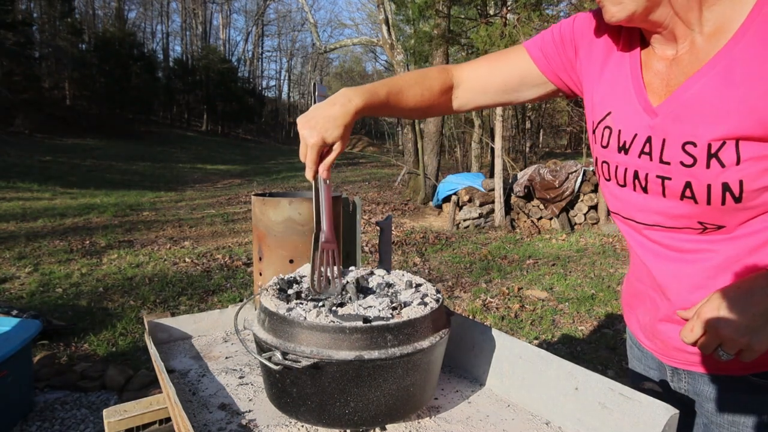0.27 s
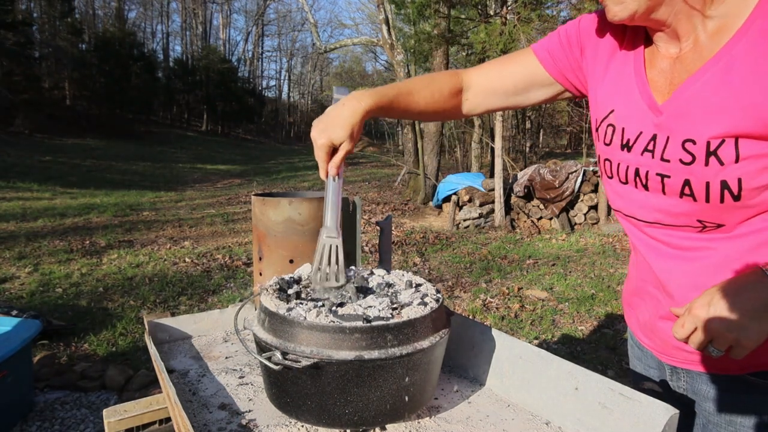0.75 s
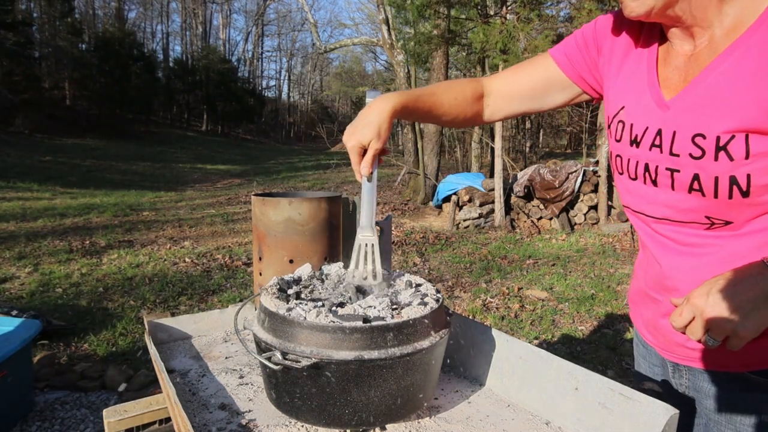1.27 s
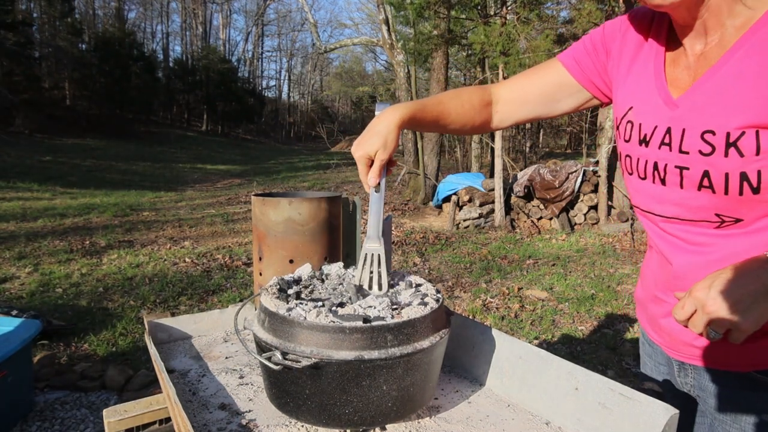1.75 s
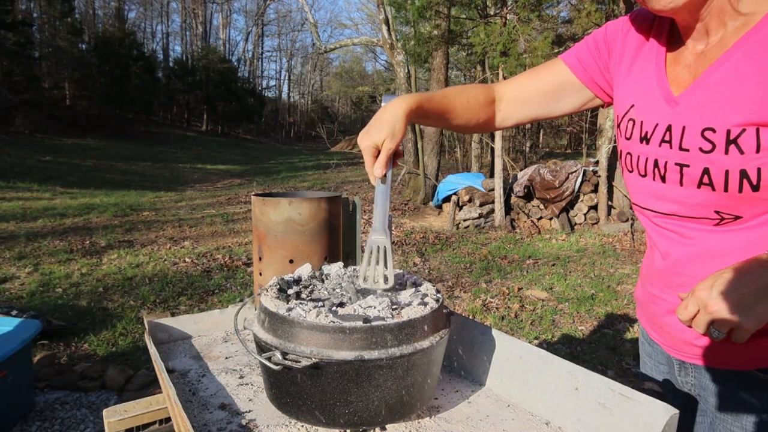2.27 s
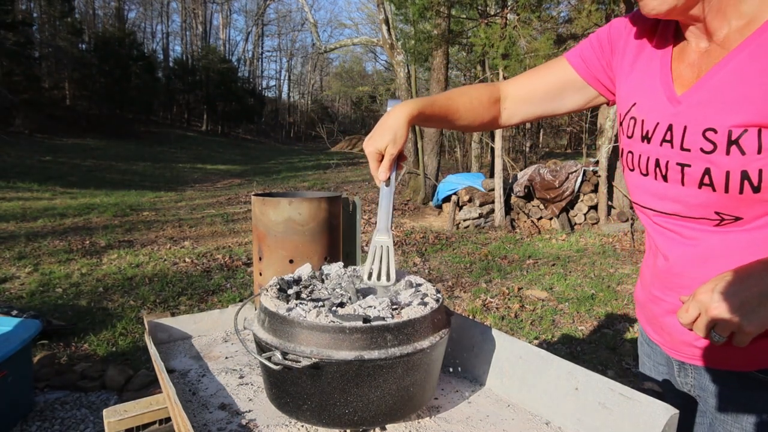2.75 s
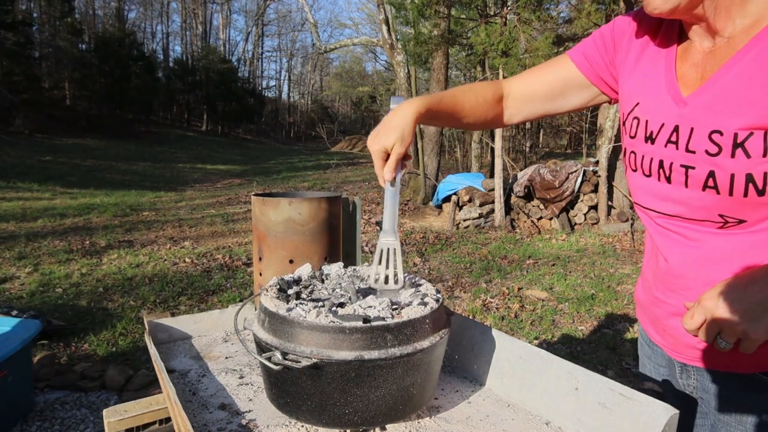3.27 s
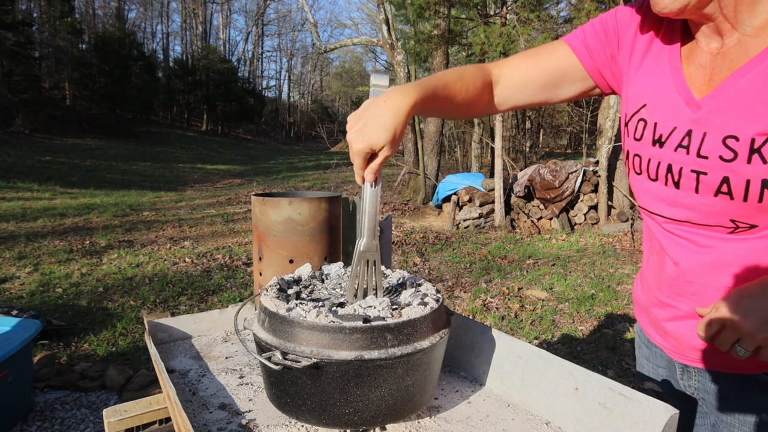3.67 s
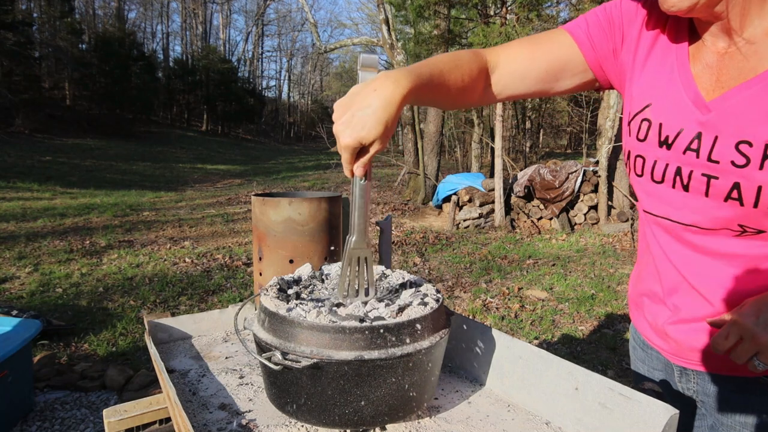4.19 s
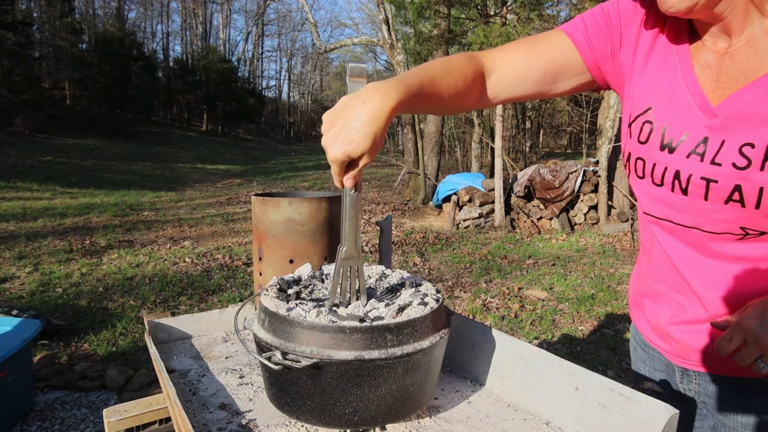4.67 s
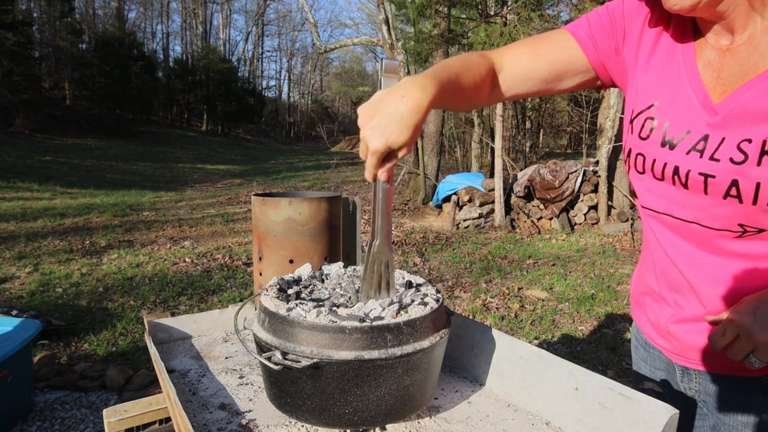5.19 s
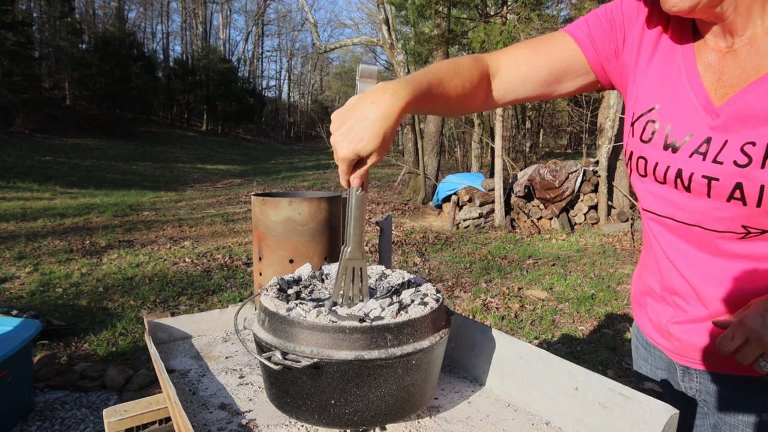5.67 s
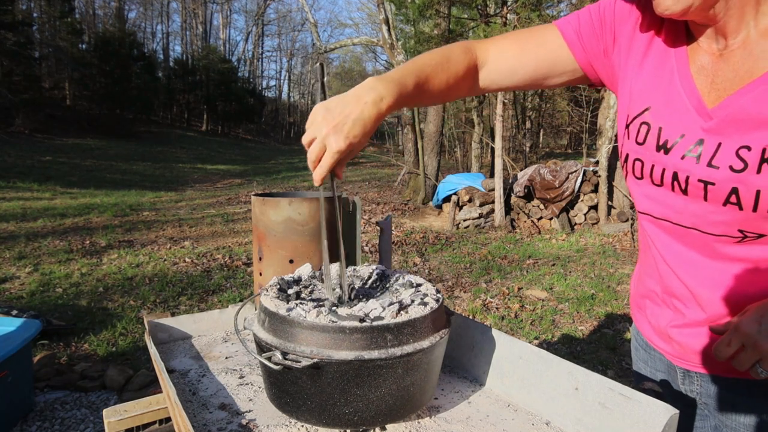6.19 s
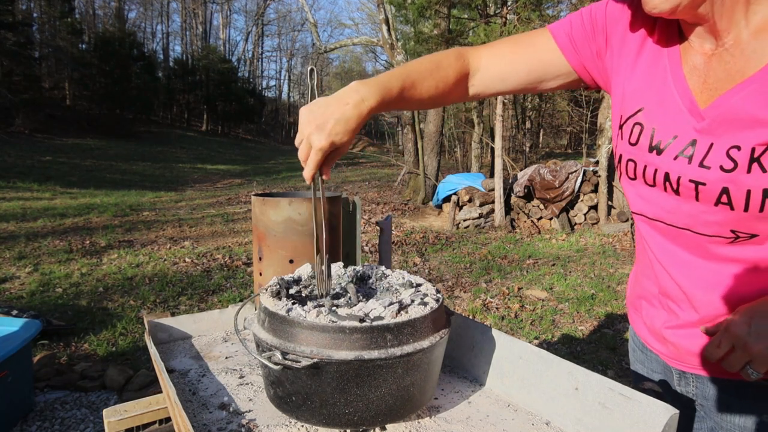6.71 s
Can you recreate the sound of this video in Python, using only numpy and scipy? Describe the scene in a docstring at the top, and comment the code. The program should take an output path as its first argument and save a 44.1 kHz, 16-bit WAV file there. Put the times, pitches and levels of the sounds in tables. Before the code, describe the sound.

A close mono outdoor scene: steel tongs work charcoal on a heavy iron lid. It opens with faint gritty scrapes, a tiny clink and brief cricket chirps, over low, uneven wind buffeting, faint leafy hiss, fine ember ticks and a second insect ticking higher up. A loud hard clack lands at 0.9 s, another at about 1.75 s, each with scraping close by and a very short dense echo. The cricket trills rapidly from about 1 to 3.4 s, and again from 4.1 to 5.7 s and 6 s to the end. From 2.5 to 4.4 s scrapes and knocks are lighter and spaced apart; firmer knocks come at 4.4, 4.9 and 5.15 s. From 5.5 s small clinks and drags crowd together, with bright sharp strikes at 6.1 s, then a soft drag at 6.4 s and one faint tick at 6.7 s as wind continues.

```python
"""Steel tongs rake charcoal on the cast-iron lid of a pot, outdoors.
From the start gritty drags excite banks of iron and steel resonances, over ember grains, a second insect's
ticks near 7 kHz, gusty wind noise and a faint leafy hiss; a cricket joins at once with trills of short falling
tones. Knocks and clinks, noise bursts through metal and charcoal, soon break in, and strokes and blows go on,
closely packed from five and a half seconds on. A dense, short echo follows all the raking and knocking."""
import sys
import numpy as np
from scipy import signal
from scipy.fft import rfft, irfft, next_fast_len
from scipy.io import wavfile
from scipy.ndimage import map_coordinates

SR = 44100
rng = np.random.default_rng(int(sys.argv[2]) if len(sys.argv) > 2 else 0)


def materialize(psi):
    """Save the field psi as 16-bit PCM at rate SR to the path in sys.argv[1].

    A 1-D psi becomes a single channel; in a 2-D psi each row is a channel.
    """
    bounded = np.clip(np.atleast_2d(psi).T, -1, 1)
    quanta = np.round(bounded * 32767).astype(np.int16)
    wavfile.write(sys.argv[1], SR, quanta)


N = 306126

# What lid and tongs ring with. Each row: centre in Hz, width in Hz, strength in dB.
METAL_MODES = [(415, 24, -6), (610, 70, -10), (810, 26, -2), (1288, 36, -2), (1660, 70, -9), (2222, 45, -4),
               (2440, 45, -11), (2680, 36, -10), (2880, 40, -11), (3355, 50, -12), (3630, 90, -14),
               (3830, 36, -12), (4250, 50, -14), (4485, 50, -12), (4885, 45, -11), (5340, 40, -12),
               (6150, 90, -17), (6850, 100, -13), (7320, 120, -13), (7645, 45, -14), (7920, 45, -11),
               (8525, 90, -5), (9210, 55, -17), (9880, 85, -14), (12120, 40, -6), (14000, 120, -19)]
# Dry colour of the charcoal itself. Each row: frequency in Hz, gain in dB.
CHARCOAL_COLOUR = [(200, -11.5), (500, -5), (1500, 1.5), (4000, -2), (6000, -12.5), (9000, -15), (15000, 0)]


def amp(db):
    """dB to gain."""
    return 10 ** (np.asarray(db) / 20)


def unit(x):
    """Scaled to rms 1."""
    return x / np.sqrt(np.mean(x ** 2) + 1e-20)


def along(points, hz):
    """Values interpolated between (Hz, value) points on a log frequency axis."""
    f, v = np.transpose(points)
    return np.interp(np.log(hz + 1), np.log(f + 1), v)


def curves(rows):
    """One value per sample for each column after the time."""
    s, *columns = np.transpose(rows)
    t = np.arange(N) / SR
    return [np.interp(t, s, column) for column in columns]


def wobble(rate):
    """A smooth random curve with rate knots a second."""
    knots = rng.standard_normal(int(N * rate / SR) + 4)
    return map_coordinates(knots, [np.arange(N) * rate / SR])


def filtered(x, response):
    """x shaped by a complex response of frequency, padded so that tails do not wrap."""
    m = next_fast_len(x.shape[-1] + 8192)
    shaped = rfft(x, m) * response(np.fft.rfftfreq(m, 1 / SR))
    return irfft(shaped, m)[..., :x.shape[-1]]


def noise(spectrum):
    """Coloured noise of rms 1."""
    return unit(filtered(rng.standard_normal(N), lambda hz: amp(along(spectrum, hz))))


def ticks(rate, spread_db):
    """Random contacts, rate a second on average, a few much larger than the rest; rms 1."""
    hits = rng.random(N) < rate / SR
    sizes = rng.standard_normal(N) * amp(spread_db * rng.exponential(size=N))
    return unit(hits * sizes)


def resonance(hz, centre_hz, width_hz):
    """One causal resonance of peak gain 1."""
    return 1j * hz * width_hz / (centre_hz ** 2 - hz ** 2 + 1j * hz * width_hz)


def metal(hz, modes, scatter_db=0):
    """A sum of modes with alternating signs, each strength scattered as by the point of contact."""
    response = 0
    for k, (centre_hz, width_hz, db) in enumerate(modes):
        strength = amp(db + scatter_db * rng.standard_normal())
        response = response + (-1) ** k * strength * resonance(hz, centre_hz, width_hz)
    return response


def registers(hz):
    """Causal bands from low to high: lid, body of the tongs, tines, tips."""
    below = [1 / (1 + 1j * hz / edge_hz) ** 3 for edge_hz in (2300, 6500, 15000)]
    above = [(1j * hz / edge_hz / (1 + 1j * hz / edge_hz)) ** 4 for edge_hz in (1500, 3800, 9000)]
    lid = below[0]
    body = above[0] * below[1]
    tines = above[1] * below[2] ** 2
    tips = (above[2] * below[2]) ** 2
    return np.array([lid, body, tines, tips])


def slipping():
    """The force of grit that catches and slips: ticks over steady noise, unevenly loud."""
    force = ticks(1500, spread_db=1.5) + 0.7 * rng.standard_normal(N)
    return force * amp(2.5 * wobble(40))


def raking():
    """Four tines drag at once, each driving its own share of the modes; the charcoal crunches."""
    # Each row: start in seconds, length in seconds, drag level at start and at end in dB, then the shares
    # of lid, tines and tips in dB against the tongs' body, and charcoal crunch in dB against the ring.
    strokes = [(0, 0.018, -30, -39, -0.5, -26, -4.5, -17), (0.044, .088, -34.5, -40.5, 1, -26, 4, -18),
               (0.528, 0.12, -37, -20, -1.5, -8.5, -26, -19), (.957, 0.16, -36, -35, 6, .5, -32, -18.5),
               (1.401, 0.013, -31, -40, 1, -1, -10, 2), (1.823, 0.044, -30.5, -25.5, -5.5, -15, -27, -10),
               (1.896, 0.12, -26.5, -35, 0, -3.5, -27, -17.5), (2.535, 0.1, -50.5, -48, -3.5, -11, 3, -21),
               (2.667, .115, -33, -34, -2, -18, 2, -24), (3.17, 0.13, -41, -28.5, -4, -22, 2.5, -23),
               (3.82, 0.315, -53.5, -49, -4, 2, -13, -8), (4.452, .05, -43, -51.5, 4, -11, -19, -9),
               (4.567, .11, -53, -52, 1, 3, -19, -14), (4.997, .04, -49, -50, 1, -11, 1, -18),
               (5.063, 0.091, -38, -43.5, 2, -11, 0.5, -17), (5.559, 0.14, -45, -44, 0.5, -9, -17, -16),
               (5.734, 0.091, -47.5, -42.5, 1, -18, -17, -15), (6.019, 0.043, -51, -53, -10, 5.5, -5, -2),
               (6.117, 0.12, -29, -54, -12, 1.5, -9, -14), (6.37, 0.18, -41, -41.5, 0, -11, 2, -23)]
    # the tines dig in, and the pressure swells a little around midway
    catch_s, catch_db, swell_db = 0.012, -20, 2.5
    lift_s, lift_db, settle_s, settle_db = 0.02, -17.5, 0.075, -32  # they lift off, crumbs roll on

    cycle = np.cumsum(55 * amp(2.5 * wobble(25))) / SR % 1  # wanders around 55 Hz
    chatter = amp(-6 * cycle)  # the springy steel catches sharply, then lets go
    tines = np.array([filtered(chatter * slipping(), lambda hz: registers(hz) * metal(hz, METAL_MODES[k::4]))
                      for k in range(4)])
    crunch = filtered(chatter * slipping(), lambda hz: registers(hz) * amp(along(CHARCOAL_COLOUR, hz)))
    out, t = np.zeros(N), np.arange(N) / SR
    for s, length, first_db, last_db, lid_db, tines_db, tips_db, crunch_db in strokes:
        end = s + length
        span = slice(max(round((s - catch_s) * SR), 0), round((end + settle_s) * SR))
        drag_db = np.interp(
            t[span],
            [s - catch_s, s, s + length / 2, end, end + lift_s, end + settle_s],
            [first_db + catch_db, first_db, (first_db + last_db) / 2 + swell_db, last_db,
             last_db + lift_db, last_db + settle_db])
        # each tine presses differently
        ring = sum(amp(3 * rng.standard_normal()) * tine[:, span] for tine in tines)
        paths = [unit(p) for p in ring + amp(crunch_db) * crunch[:, span]]
        out[span] += amp(drag_db) * (amp([lid_db, 0, tines_db, tips_db]) @ paths)
    return out


def embers():
    """Embers and ash tick in clumps of short grains; a second insect ticks irregularly near 7 kHz."""
    out = np.zeros(N)
    # centre in Hz, width in Hz, level in dB before the overall trim; the narrow third row is the insect
    for hz, width_hz, db in [(2290, 3400, -1.5), (3380, 3600, 0), (7010, 640, 0.0), (8270, 1500, -6.5)]:
        clumps = ticks(600, spread_db=1.5) * amp(4.2 * wobble(40))
        grains = filtered(clumps, lambda f: resonance(f, hz, width_hz) ** 2)
        out += amp(db) * unit(grains)
    return amp(-56.5) * out


def outdoors():
    """Wind buffets the microphone as low, gusty noise over a faint leafy hiss."""
    # Each row: time in seconds, buffet level in dB, flutter in dB against the buffet.
    gusts = [(0, -30.5, -8), (0.35, -25, -8), (0.7, -19, -14), (1.1, -19.5, -5.5), (1.5, -27, -3),
             (2, -21.5, -7), (2.5, -26.5, -5), (3, -19.5, -7.5), (3.5, -24, -5.5), (4, -21, -9.5),
             (4.4, -27, -6), (4.8, -23.5, -10), (5.3, -23.5, -11), (5.7, -21, -9), (5.9, -23.5, -10),
             (6.2, -21.5, -8.5), (6.6, -22, -9), (6.94, -27, -8.5)]
    # Deep push of the wind. Each row: frequency in Hz, density in dB per Hz.
    buffet_colour = [(7.1, 2.5), (12, 0), (37, 5), (113, -12), (130, -11), (170, -24), (290, -120)]
    # Higher flutter of the wind. Each row: frequency in Hz, density in dB per Hz.
    flutter_colour = [(35, -57), (60, -2), (206, -10), (456, -29), (511, -32), (612, -35), (900, -41),
                      (1170, -93), (1980, -120)]
    # Faint, steady leafy hiss of the open air. Each row: frequency in Hz, density in dB per Hz.
    air_colour = [(290, -18), (500, 0), (960, 0.5), (2730, -4.5), (4660, -1.5), (5880, -2), (6900, -7),
                  (10100, -11.5), (14000, -8), (16000, -14)]

    buffet_db, flutter_db = curves(gusts)
    buffet = unit(amp(1.04 * wobble(20)) * noise(buffet_colour))
    flutter = unit(amp(2.08 * wobble(28)) * noise(flutter_colour))
    wind = amp(buffet_db) * (buffet + amp(flutter_db) * flutter)
    hiss = amp(-51 + 2.5 * wobble(3.405)) * noise(air_colour)
    return wind + hiss


def cricket():
    """Every wing stroke is a short tone that falls in pitch, with a faint third harmonic."""
    # Each row: time of the first stroke in seconds, number of wing strokes, strokes per second.
    trills = [(.007, 7, 38), (.398, 4, 38), (.988, 92, 37.8), (4.078, 62, 38.2), (5.964, 38, 38.1)]
    gained_s, eager_strokes = 0.013, 2.5  # the opening strokes crowd together, then the rate holds

    out, t = np.zeros(N + SR), np.arange(round(0.013 * SR)) / SR
    u = t / t[-1]  # progress through one stroke
    for s, strokes, rate in trills:
        k = np.arange(strokes)
        for at in s + k / rate - gained_s * (1 - np.exp(-k / eager_strokes)):
            late, size_db, tune = rng.standard_normal(3)
            pitch_hz = (5040 - 640 * u) * (1 + 0.004 * tune)
            phase = 2 * np.pi * np.cumsum(pitch_hz) / SR
            tone = np.sin(phase) + amp(-23) * np.sin(3 * phase)
            start = max(round((at - 0.007 + 0.0012 * late) * SR), 0)  # roughly centred, loosely timed
            out[start:][:len(t)] += amp(-40.5 + size_db) * np.sin(np.pi * u) * tone
    return out[:N]


def lumps(hz, lump_hz):
    """A knocked piece of charcoal: a dry spectrum, its own dull pitch and four chance partials."""
    pitches = lump_hz * 5 ** rng.uniform(-0.5, 1, 4)
    partials = sum(resonance(hz, c, 0.08 * c) for c in pitches)
    dull = 4.6 * resonance(hz, lump_hz, 0.068 * lump_hz)
    return amp(along(CHARCOAL_COLOUR, hz)) * (1 + 2 * partials) + dull


def blows():
    """Each blow is a sharp contact and a short rattle into the metal and the charcoal."""
    # Each row: time in seconds, peak of the tongs' body in dB, shares of lid and tines in dB against
    # that body, pitch of the charcoal lump in Hz.
    knocks = [(0.0463, -28, -16, 4, 835), (0.9024, -5.5, -2.5, -45, 1284), (0.945, -19, -31, -29, 1300),
              (1.461, -19, 5, -41, 860), (1.7557, -5, -6, -45, 1324), (1.7829, -14.5, -5.5, -36, 1280),
              (1.8937, -14, -13, -20, 2820), (1.9117, -14, -21, -3, 795), (2.5346, -28.5, -6, -0.5, 1220),
              (2.608, -38, -12, 2, 2660), (2.899, -37.5, 2, -20, 796), (3.1661, -31, 0, 3, 2660),
              (3.241, -18, -5, -7, 1280), (3.6683, -22.5, -1, -12, 660), (3.8374, -37.5, -3, 5, 820),
              (4.1476, -32, -5, 2.5, 1180), (4.4285, -13.5, 2, -33, 590), (4.5246, -36.5, 0, 5, 790),
              (4.6249, -27, -12, -1.5, 4400), (4.7409, -31, 0, -20, 780), (4.9183, -13, -4, -2, 606),
              (5.0497, -33, 0, 4, 820), (5.1563, -13, -39, -2, 4360), (5.4865, -17.5, 7, -48, 1280),
              (5.5455, -21, -1.5, -25, 814), (5.6262, -33.5, -23, 13, 635), (5.663, -28.5, -1, 10.5, 1470),
              (5.679, -21, -25, 4, 3370), (5.692, -15.5, -6.5, 10, 770), (5.8143, -33.5, -30, -20, 730),
              (6.009, -22, 2.5, -4, 740), (6.1, -9.5, -8.5, 1, 3420), (6.1265, -14.5, -9, -10, 3400),
              (6.71, -39.5, -19, 7, 2920)]
    rattle_s, longer_s_per_db = 0.032, 0.00045  # 60 dB decay; the less the tines ring, the longer

    out, t = np.zeros(N + SR), np.arange(SR // 6) / SR
    for s, db, lid_db, tines_db, lump_hz in knocks:
        t60 = rattle_s - longer_s_per_db * tines_db
        rattle = amp(-60 * t / max(t60, 0.003))
        contact = 0.5 * amp(-60 * t / 0.0012)
        force = rng.standard_normal(len(t)) * (rattle + contact)
        # the charcoal is mixed in at -14 dB
        struck = lambda hz: metal(hz, METAL_MODES, scatter_db=3.5) + amp(-14) * lumps(hz, lump_hz)
        paths = filtered(force, lambda hz: registers(hz) * struck(hz))
        paths = paths / np.abs(paths).max(axis=1, keepdims=True)
        shares = amp([lid_db, 0, tines_db, tines_db + 3.5])  # the tips follow the tines
        out[round(s * SR):][:len(t)] += amp(db) * (shares @ paths)
    return out[:N]


def ground(x):
    """Table and ground throw back a dense noise echo from 2 ms on, decaying 60 dB in 80 ms."""
    echo = np.zeros(SR // 10)
    t = np.arange(len(echo)) / SR
    echo[90:] = (rng.standard_normal(len(echo)) * amp(-60 * t / 0.08))[90:]
    return signal.fftconvolve(x, echo / np.linalg.norm(echo))[:N]


def scene():
    """The pot with its echoes, the embers and insects and the open air, in mono."""
    pot = raking() + blows()
    echoes = amp(-10) * ground(pot)
    return (pot + echoes + embers() + outdoors() + cricket())[None]


def record(dry):
    """The top treble slopes down by 22 dB to a shelf, and nothing is left from the edge up."""
    top_hz, edge_hz = 15900, 16700
    return filtered(dry, lambda hz: amp(np.interp(hz, [top_hz - 500, top_hz], [0, -22])) * (hz < edge_hz))


dry = scene()
out = record(dry)
materialize(out)
```